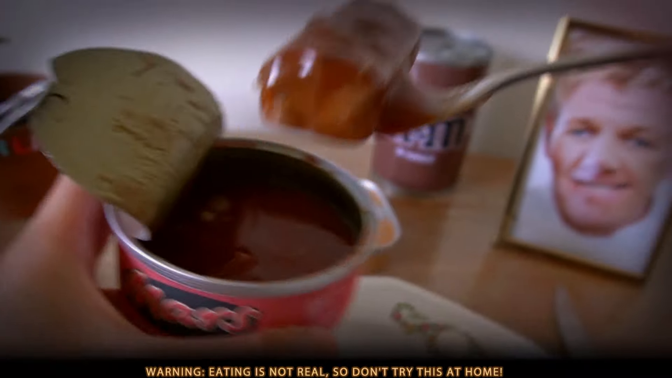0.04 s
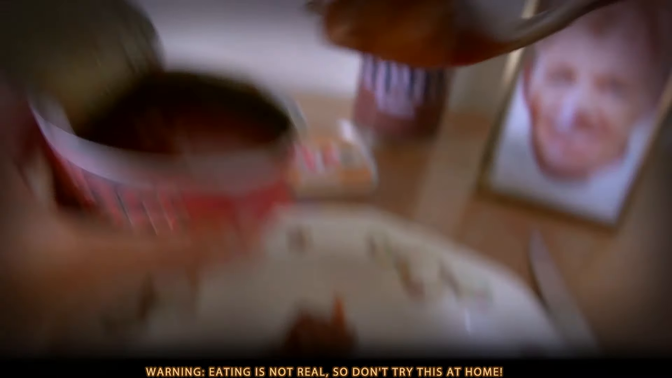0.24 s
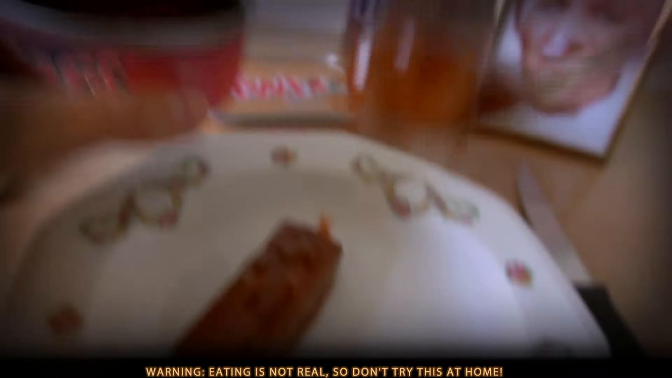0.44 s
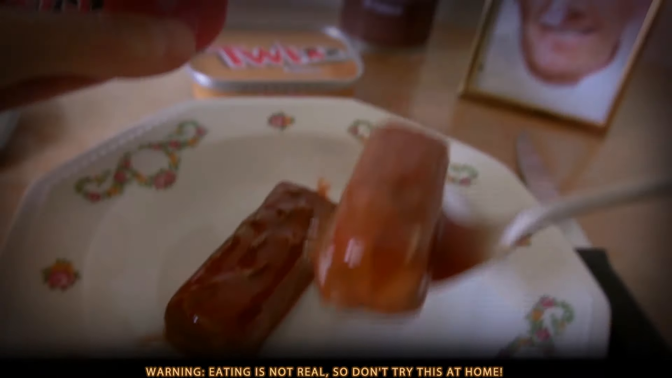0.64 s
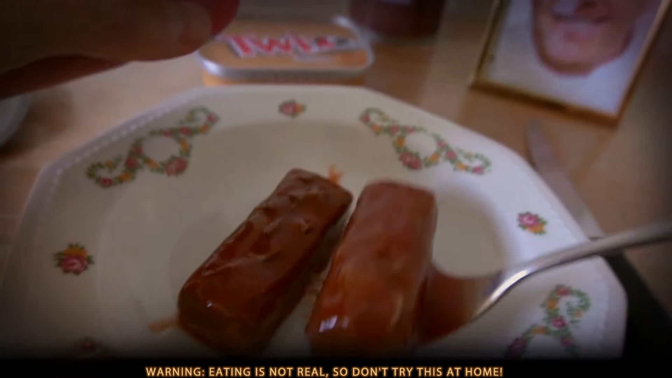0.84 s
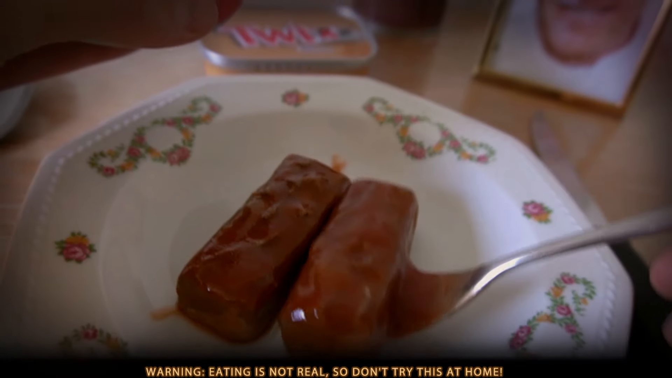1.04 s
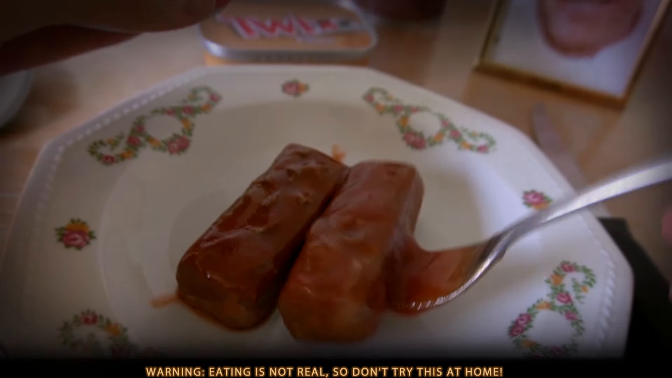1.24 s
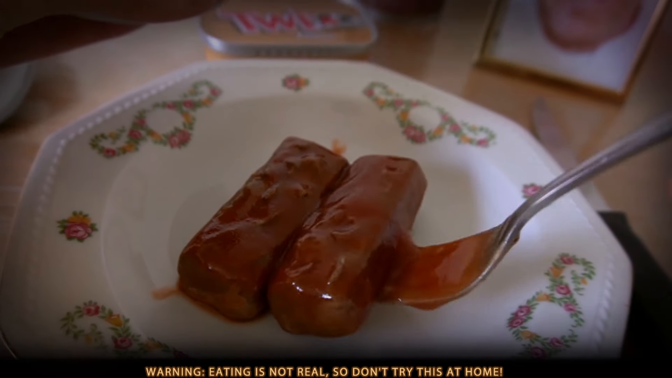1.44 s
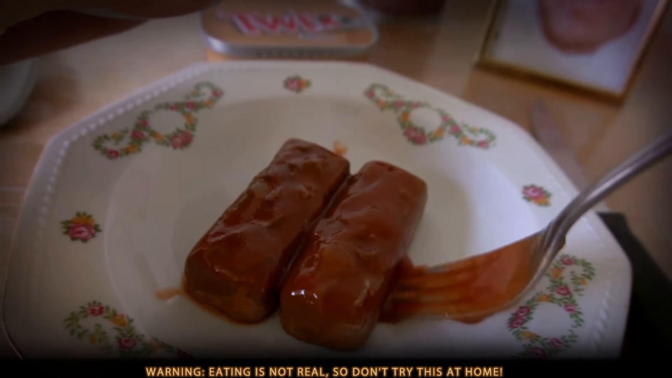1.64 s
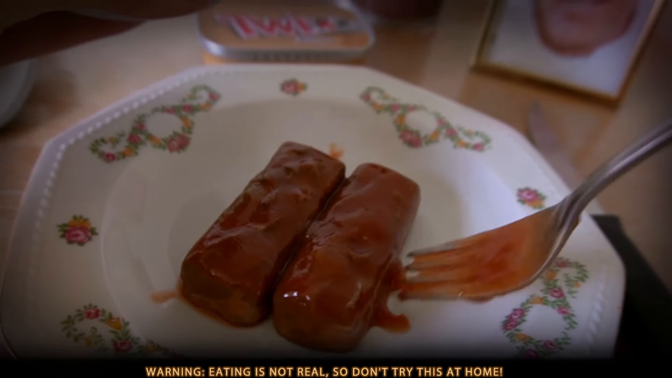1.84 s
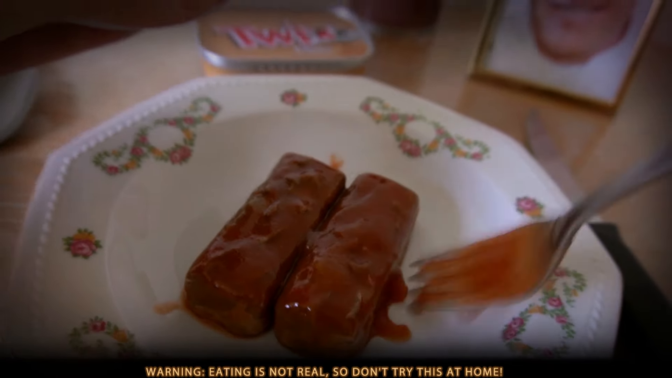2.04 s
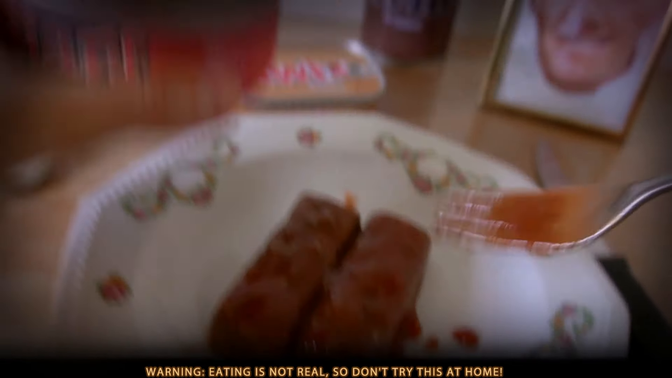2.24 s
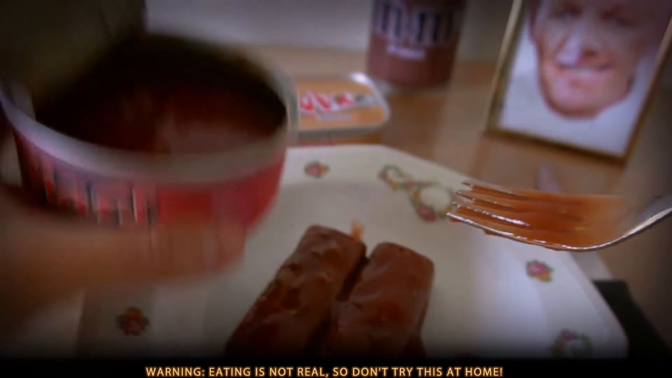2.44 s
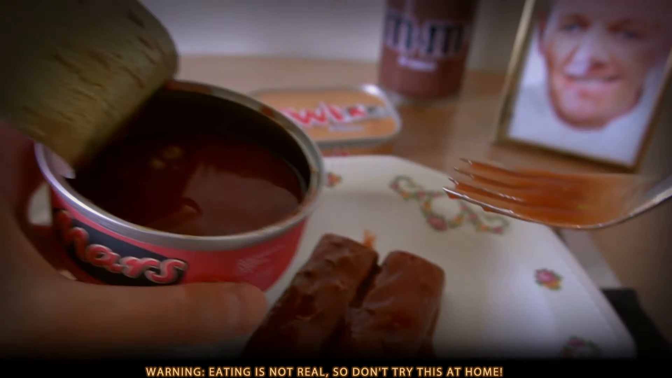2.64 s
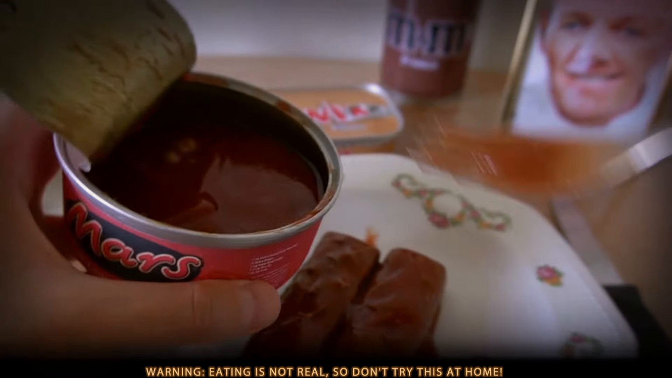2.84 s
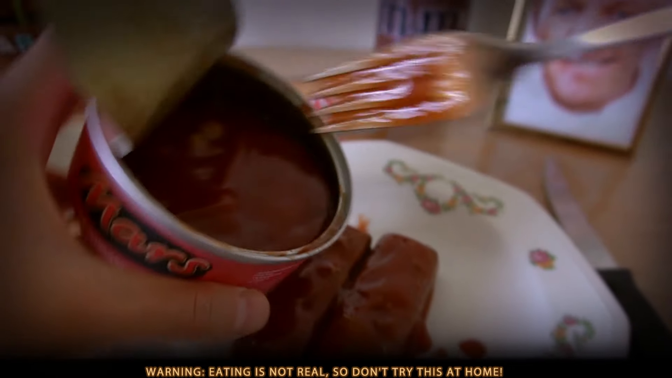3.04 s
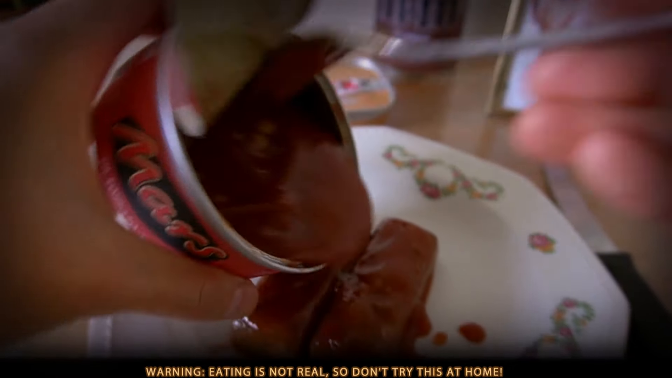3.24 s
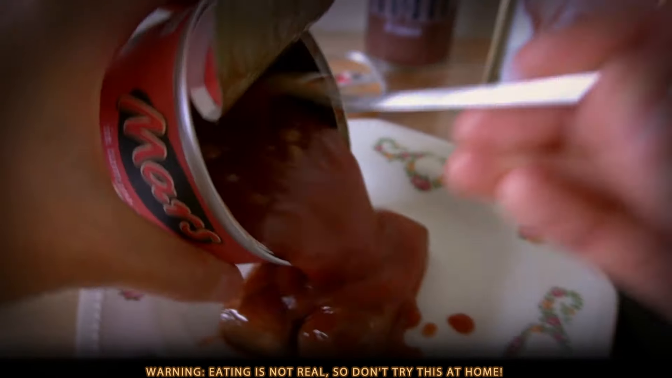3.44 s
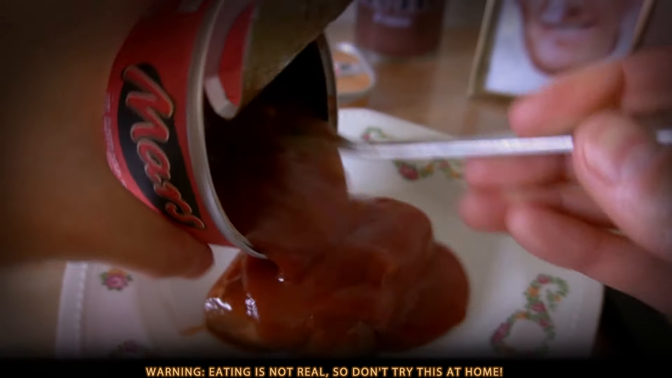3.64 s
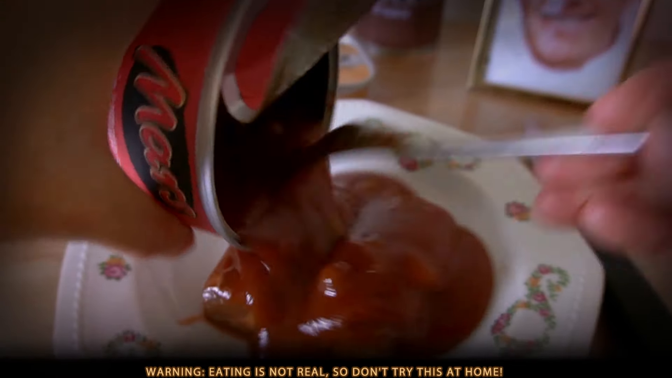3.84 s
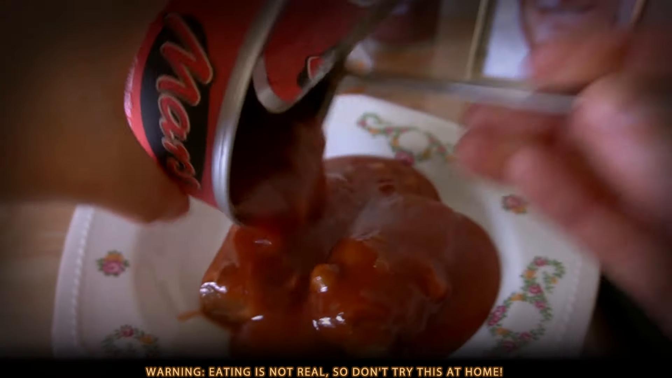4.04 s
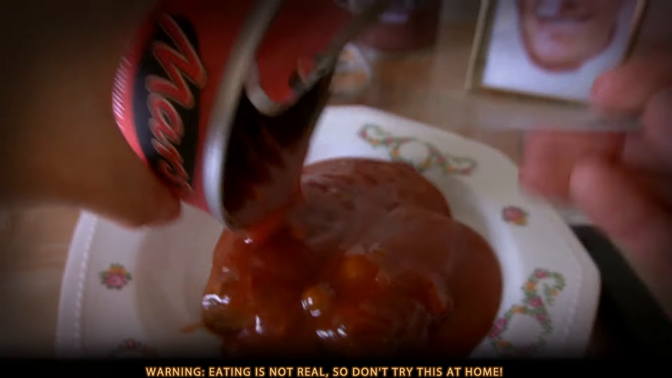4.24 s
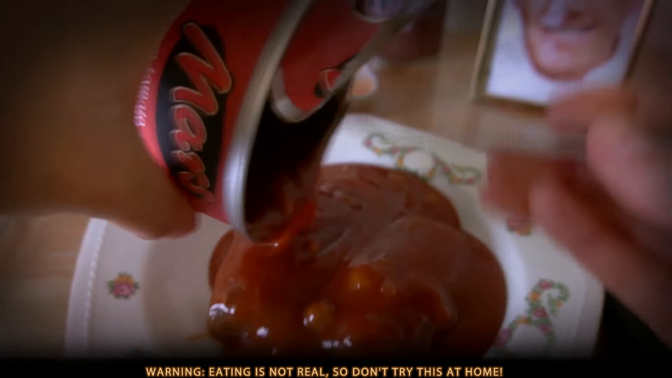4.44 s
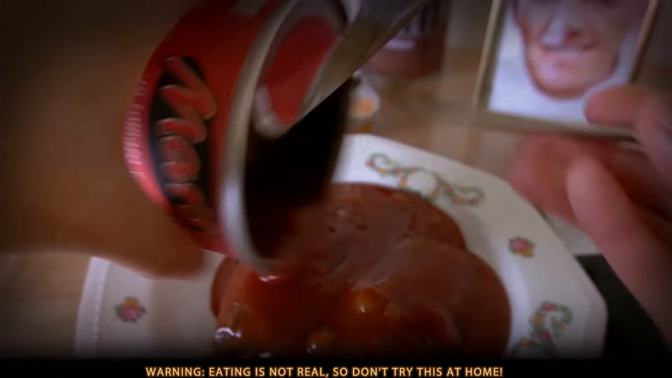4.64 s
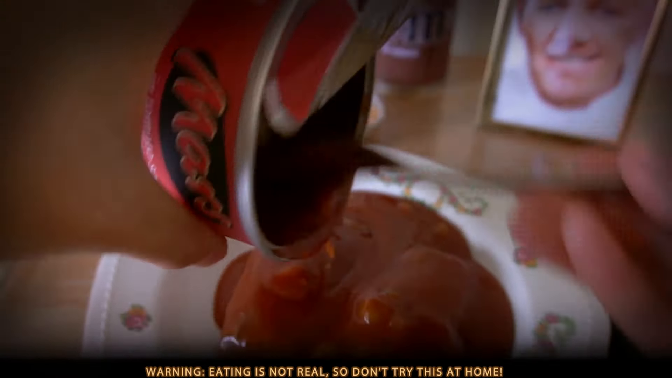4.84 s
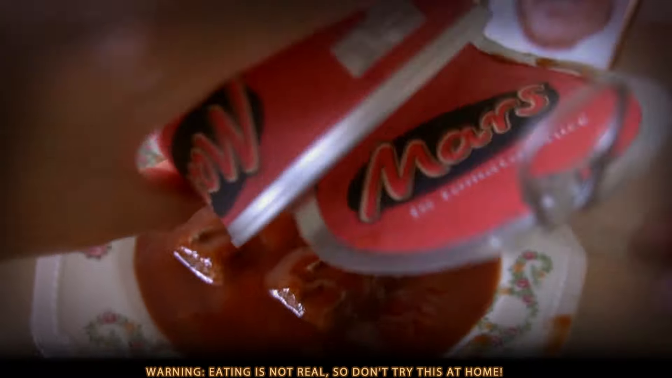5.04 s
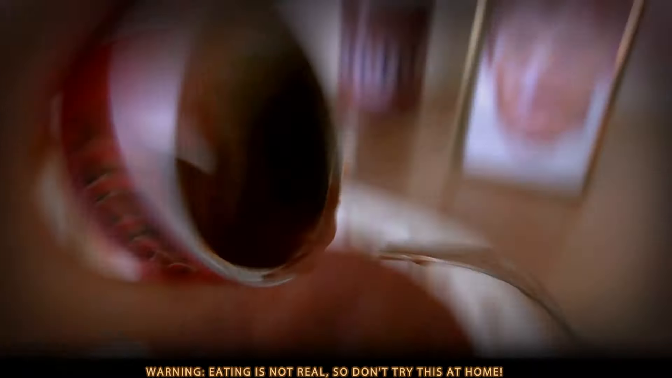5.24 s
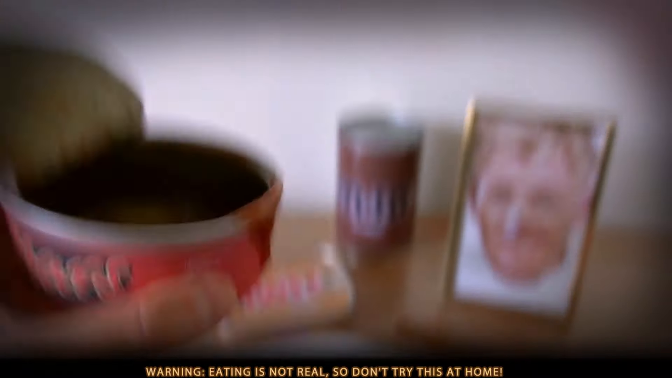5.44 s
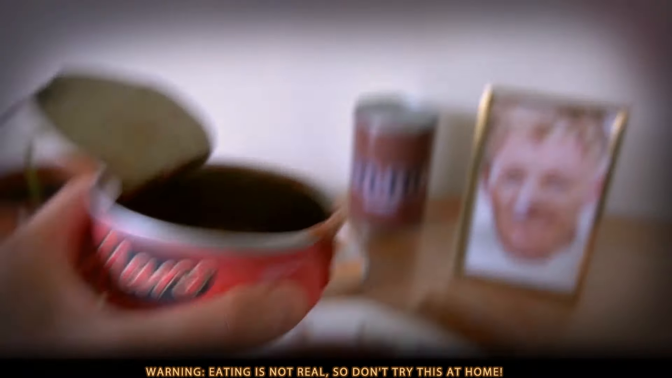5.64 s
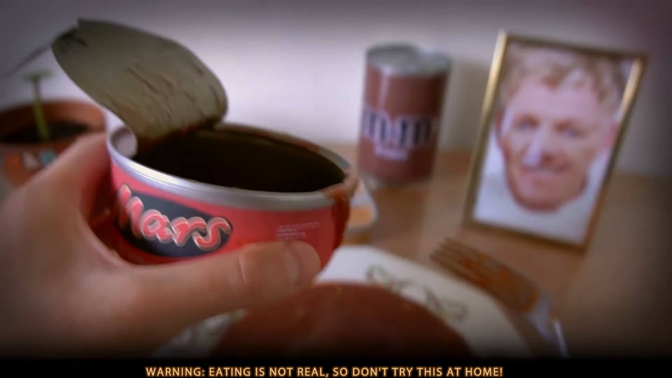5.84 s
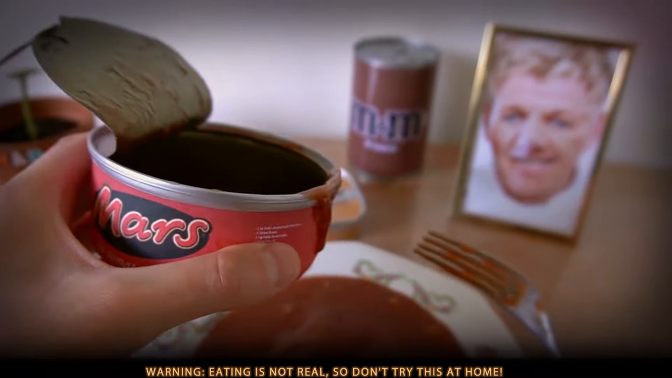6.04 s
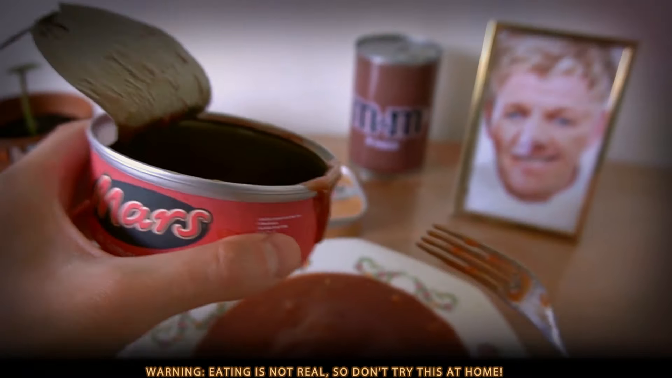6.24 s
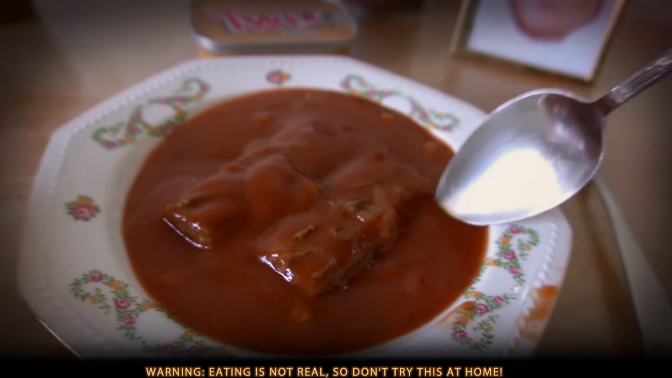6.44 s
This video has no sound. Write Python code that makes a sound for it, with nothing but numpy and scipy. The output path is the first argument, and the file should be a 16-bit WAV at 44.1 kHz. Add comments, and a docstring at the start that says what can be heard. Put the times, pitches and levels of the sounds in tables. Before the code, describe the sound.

Soft, low-weighted room tone runs throughout, wide in stereo. At about 1.0 s a loaded fork touches a china plate: a deep, round thump that throbs slowly in the table, with a tiny muted ping. From 1.3 to 1.8 s the tines slide out in four faint, bright pulls, with a wooden knock near 1.44 s. A soft touch and small china ping come at 2.13 s, then quiet. At 3.27 s the fork enters an open tin with a knock and a squeaky scrape, followed by single knocks near 3.5 and 3.76 s and short scrapes around 3.85 s. From 4.0 to 4.9 s hollow knocks, ringing metal, gritty judders and low tin thuds crowd in clusters, strongest near 4.75 s. A final knock and scrape at 5.15 s are cut dead with their echo at 5.3 s. Room tone remains, with a faint rub from 6.35 s until the end at about 6.5 s.

```python
"""A fork sets a sauce-coated bar on a china plate, which thumps on the table, then slides out from under it.
Next it knocks, scrapes and squeaks inside an open tin that thuds on the plate, in a small live room.
Noise bursts strike the resonances of table, china and tin; stick-slip noise drives the slides and scrapes.
At 5.323 s action and echo are cut off; room tone goes on alone, joined late by a faint rub of coloured noise."""
import sys
import numpy as np
from scipy import signal
from scipy.fft import rfft, irfft, next_fast_len
from scipy.io import wavfile
from scipy.ndimage import map_coordinates

SR = 44100
rng = np.random.default_rng(int(sys.argv[2]) if len(sys.argv) > 2 else 0)


def transcribe(u):
    """Save the signal u as a 16-bit wav file named by the first command-line argument.

    u: samples, shape (n,) or (channels, n), limited to [-1, 1]; the rate is SR.
    q: integer samples, one column per channel.
    """
    v = np.clip(np.atleast_2d(u).T, -1, 1)
    q = np.round(v * 32767).astype(np.int16)
    wavfile.write(sys.argv[1], SR, q)


N = 287091

# room tone colour: (frequency [Hz], relative density [dB per Hz])
AIR_COLOUR = [(12, -45.5), (20, -17), (59, -4.5), (122, -1), (157, -9), (219, -7), (245, -10.5), (372, -14),
              (614, -17.5), (667, -18), (1340, -21), (1870, -20.5), (2760, -25), (13900, -31.5),
              (15500, -52.5)]
# room tone stereo width: (frequency [Hz], side over mid [dB])
AIR_WIDTH = [(60, -19.5), (110, -12.5), (200, -6.5), (380, 1.5), (700, 2.5), (1290, 2), (2380, 0),
             (4400, -1), (8120, -2), (15000, -2.5)]
# stereo width of all other noise: (frequency [Hz], side over mid [dB])
SOURCE_WIDTH = [(120, -35.5), (300, -24.5), (700, -12), (1400, -12), (2400, -8.5), (4000, -3), (8000, -3),
                (13000, -5)]
# fork on the plate: (time [s], thump [dB], table knock [dB], china ping [dB], tick [dB])
PLATE_TOUCHES = [(0.9896, -16, -36.5, -49.5, -47), (1.0151, -70, -40, -59, -60),
                 (1.377, -36, -48.5, -83, -82), (1.436, -30, -30, -65, -65),
                 (1.797, -85, -61.5, -58, -54.5), (2.1297, -28, -47, -38.5, -46)]
# table top under the plate: (resonance [Hz], width [Hz], level [dB])
TABLE_MODES = [(218, 27.5, 5), (305, 35, 5.5), (424, 98, -6.5), (590, 73, -8), (814, 220, -13),
               (1370, 1600, -23), (3540, 440, -22.5)]
# china: (resonance [Hz], width before damping [Hz], level [dB])
CHINA_MODES = [(2404, 56, 1), (3390, 57, -3), (4290, 47, -9), (6130, 85, -6), (6600, 94, -7.5),
               (7120, 98, -2.5), (7930, 77, -11), (8200, 76, -1), (10180, 47, -3.5), (10850, 61, -10),
               (11500, 77, -10), (12670, 97, -1)]
# plate rocking on the table, close modes that beat: (frequency [Hz], level [dB], t60 [s], polarity [sign])
ROCKING_MODES = [(116.3, 0, .43, 1), (121.9, -6, .95, -1), (130.1, -8.5, 1.15, -1)]
# room decay: (frequency [Hz], t60 [s])
ROOM_DECAY = [(150, 0.46), (500, 0.48), (1200, 0.44), (3000, 0.49), (7000, 0.41), (14000, 0.54)]
# room colour: (frequency [Hz], level [dB])
ROOM_COLOUR = [(120, 0), (300, 0), (1200, -1), (3500, -1.5), (8000, -4), (14000, -11.5)]
# tines sliding on china: (start [s], hardest push [s], end [s], level [dB])
SLIDE_PULLS = [(1.281, 1.33, 1.36, -55.5), (1.393, 1.45, 1.52, -51), (1.551, 1.624, 1.70, -48.5),
               (1.719, 1.777, 1.815, -52.5)]
# light touches of the tines: (time [s], level [dB])
TINE_TICKS = [(3.11, -66), (4.08, -37), (4.128, -48), (4.136, -51), (4.21, -43.5), (5.036, -53.5),
              (5.193, -57), (6.365, -72)]
# fork against the tin: (time [s], relative strength [dB], hardness [dB per octave],
# three resonances under the fork [Hz, Hz, Hz])
TIN_KNOCKS = [(3.2668, -33, -1.3, 1260, 1440, 3800), (3.5195, -29.5, -0.16, 654, 1223, 2270),
              (3.7648, -36.5, 3, 900, 1410, 2960), (4.005, -27.5, -2, 870, 1275, 3720),
              (4.0697, -30.5, 2, 574, 1150, 2620), (4.1758, -29.5, 2, 845, 2510, 3144),
              (4.359, -26, .6, 800, 1046, 3700), (4.4312, -31.5, 2.5, 636, 1130, 2370),
              (4.4853, -30, 1, 820, 400, 4270), (4.6775, -28.5, 2.5, 810, 1190, 1600),
              (4.7403, -27, 0.5, 481, 2350, 3600), (5.1519, -27, -1.8, 1228, 1900, 3160)]
# tin: (resonance before detuning [Hz], width [Hz], level [dB])
TIN_MODES = [(262, 60, -11), (448, 78, -11), (629, 128, -3), (884.4, 102, 2.5), (1094, 64, 1),
             (1222.4, 62, 5), (1532, 155, -1), (1986, 273, -3.5), (2328, 141, -2.5), (3110, 85, -8),
             (3605, 76, -12), (4300, 60, -16), (5000, 93, -28)]
# registers of the tin, hollow, lid, wall, rim, crack: (low [Hz], high [Hz], t60 of the contact's buzz [s])
TIN_REGISTERS = [(170, 900, .04), (900, 1800, .028), (1800, 2900, .024), (2900, 5000, .018),
                 (5000, 14800, .013)]
# answer of each register to a plain knock: relative level [dB]
REGISTER_ANSWERS_DB = [-2, -0.25, 0.75, -1.3, 1]
# the fork's own ring: (frequency [Hz], level [dB], t60 [s])
FORK_MODES = [(1195, 0.5, .45), (1249, 2, 1.33), (2380, -7, .42), (3464, -16, .3)]
# fork strokes in the tin: (start [s], hardest push [s], end [s], strength [dB],
# hollow boom over strength [dB], bite over strength [dB])
TIN_STROKES = [(3.285, 3.34, 3.42, -29.5, -9.5, -17), (3.444, 3.463, 3.505, -38.5, -15, -18),
               (3.819, 3.848, 3.868, -38, -9, -17.5), (3.871, 3.883, 3.903, -34, -14, -16),
               (4.018, 4.024, 4.062, -20.5, -5.5, -25.5), (4.088, 4.084, 4.118, -23.5, -3, -17.5),
               (4.125, 4.138, 4.146, -24.5, -15.5, -19), (4.207, 4.23, 4.275, -30, -5, -10),
               (4.376, 4.409, 4.419, -23.5, -5.5, -22), (4.446, 4.446, 4.478, -24.5, -5, -14.5),
               (4.495, 4.497, 4.53, -37, 13, 4), (4.697, 4.732, 4.735, -22, -2.5, -15),
               (4.754, 4.745, 4.785, -16.5, -10, -14.5), (4.796, 4.823, 4.84, -24.5, -7, -3),
               (4.845, 4.847, 4.875, -20, -10.5, -14.5), (4.979, 4.99, 5.012, -46.5, -7.5, 5),
               (5.173, 5.195, 5.26, -30.5, 0, -11)]
# creaks of the bending lid and squeaks of the tines, gliding:
# (start [s], loudest [s], end [s], start pitch [Hz], end pitch [Hz], level [dB])
CREAK_GLIDES = [(3.29, 3.421, 3.46, 424, 705, -41.5), (3.29, 3.353, 3.42, 1220, 910, -34.5),
                (3.285, 3.34, 3.39, 1587, 1495, -28.5), (3.29, 3.347, 3.44, 1304, 1373, -30),
                (3.455, 3.473, 3.512, 1474, 1666, -38), (4.489, 4.502, 4.515, 4280, 4224, -36.5),
                (4.49, 4.505, 4.525, 3140, 2703, -38)]
# low thuds of the tin touching the plate: (time [s], level [dB])
TIN_THUDS = [(3.518, -48.5), (3.764, -46), (4.071, -42.5), (4.175, -36.5), (4.432, -45), (4.487, -43),
             (4.741, -50)]
# faint rub: (time [s], level [dB])
RUB_LEVEL = [(6.3, -76.5), (6.37, -56), (6.44, -54.5), (6.51, -50.5)]
# rub colour: (frequency [Hz], relative density [dB per Hz])
RUB_COLOUR = [(200, -7.5), (400, -8.5), (900, -13), (2200, -7), (5000, -2.5), (11000, -6.5), (15000, -11)]

AIR_DB = -58.5
CUT_S = 5.323
TOP_HZ = 14650
KNOCK_DB, FORK_DB = -7, -10.5  # added to the strength of each knock
SPOT_DB = 8  # register lift per resonance under the fork
PIVOT_HZ = 1526  # hardness tilts the registers about this
WALL_DB, WALL_BITE = 3.5, 0.59  # wall level over strength; share of the bite added to it
# growth before and decay after the hardest push
SLIDE_RISE_DB_PER_S, SLIDE_FALL_DB_PER_S = 220, 280
STROKE_RISE_DB_PER_S, STROKE_FALL_DB_PER_S = 109.5, 203
CREAK_RISE_DB_PER_S, CREAK_FALL_DB_PER_S = 132, 240


def amp(db):
    """Decibels to gain."""
    return 10 ** (np.asarray(db) / 20)


def unit(x):
    """Scale to rms 1."""
    return x / np.sqrt(np.mean(x ** 2) + 1e-20)


def blow(x):
    """Scale to the energy of 30 ms at rms 1."""
    energy = np.sum(np.mean(np.atleast_2d(x) ** 2, axis=0))
    return x / np.sqrt(energy / (.03 * SR) + 1e-20)


def along(points, hz):
    """Interpolate (Hz, value) points on a log axis."""
    f, v = np.transpose(points)
    return np.interp(np.log(hz + 1), np.log(f + 1), v)


def level(rows):
    """Gain per sample from (s, dB) rows, -120 dB before them."""
    return amp(np.interp(np.arange(N) / SR, *np.transpose(rows), left=-120))


def add(track, time_s, x):
    """Mix x into the track at a time."""
    slot = track[..., round(time_s * SR):][..., :x.shape[-1]]
    slot += x[..., :slot.shape[-1]]


def filtered(x, response):
    """Apply a complex response of frequency."""
    m = next_fast_len(x.shape[-1] + SR // 4)
    return irfft(rfft(x, m) * response(np.fft.rfftfreq(m, 1 / SR)), m)[..., :x.shape[-1]]


def body(x, modes):
    """Parallel resonances of alternating polarity."""
    def response(f):
        total = 0
        for k, (hz, width_hz, db) in enumerate(modes):
            damping = 1j * f * width_hz
            total = total + (-1) ** k * amp(db) * damping / (hz * hz - f * f + damping)
        return total
    return filtered(x, response)


def band(x, low_hz, high_hz):
    """Causal band-pass."""
    return signal.sosfilt(signal.butter(2, [low_hz, high_hz], "band", fs=SR, output="sos"), x)


def stereo(size, width):
    """White mid noise, with side noise set per frequency by the width table."""
    mid, side = rng.standard_normal((2, size))
    side = filtered(side, lambda hz: amp(along(width, hz)))
    return unit(np.array([mid + side, mid - side]))


def hiss(colour, width):
    """Stereo noise of rms 1 with the given colour."""
    return unit(filtered(stereo(N, width), lambda hz: amp(along(colour, hz))))


def contact(t60_s, size=SR // 3):
    """Brief buzz of two hard things meeting: decaying noise."""
    return stereo(size, SOURCE_WIDTH) * amp(-60 * np.arange(size) / SR / t60_s)


def slips(size, rate_hz, scatter_db, t60_s, drag):
    """Stick and slip: bursts of uneven size at an uneven rate, over a steady drag."""
    chance = rng.standard_normal((size // 40, 2))
    at = np.cumsum(np.exp(.5 * chance[:, 0]) * SR / rate_hz).astype(int)
    kicks = np.bincount(at, amp(scatter_db * chance[:, 1]), size)[:size]
    grip = signal.lfilter([1], [1, -amp(-60 / SR / t60_s)], kicks)
    return stereo(size, SOURCE_WIDTH) * (unit(grip) + drag)


def stroke_time(start_s, end_s):
    """Time axis [s] of a stroke, with 10 ms to spare at each end."""
    return np.arange(start_s - .01, end_s + .01, 1 / SR)


def swell(t, start_s, peak_s, end_s, rise_db_per_s, fall_db_per_s, fade_s=.006):
    """Gain of one push: grows until the peak, eases off, stops as the contact lifts."""
    touch = np.clip(np.minimum(t - start_s, end_s - t) / fade_s + 1, 0, 1)
    return touch * amp(-np.maximum(rise_db_per_s * (peak_s - t), fall_db_per_s * (t - peak_s)))


def wobble(size, rate_hz):
    """Smooth random curve, rate_hz knots a second."""
    knots = rng.standard_normal(int(size * rate_hz / SR) + 4)
    return map_coordinates(knots, [np.arange(size) * rate_hz / SR])


def travelling(force, modes, swing_db, rate_hz):
    """A moving contact crosses nodes and bellies, so each resonance swells and fades on its own."""
    out = 0
    for k, mode in enumerate(modes):
        gain = amp(swing_db * wobble(force.shape[-1], rate_hz))
        out = out + (-1) ** k * body(force, [mode]) * gain
    return out


def room_tone():
    """Steady coloured stereo noise."""
    return amp(AIR_DB) * hiss(AIR_COLOUR, AIR_WIDTH)


def china(damping):
    """China resonances broadened by damping."""
    return [(hz, width_hz * damping, db) for hz, width_hz, db in CHINA_MODES]


def plate():
    """Each touch knocks the table, pings the laden china and ticks."""
    out = np.zeros((2, N))
    for s, _, knock_db, china_db, tick_db in PLATE_TOUCHES:
        add(out, s, amp(knock_db) * blow(body(contact(0.021), TABLE_MODES)))
        add(out, s, amp(china_db) * blow(body(contact(0.018), china(damping=1.7))))
        add(out, s, amp(tick_db) * blow(band(contact(0.004), 670, 18000)))
    return out


def rocking(rise_s=.006):
    """Each touch rocks the plate; close modes beat in a slow throb through the table, not the room."""
    out, t = np.zeros(N), np.arange(SR) / SR
    rock = np.zeros(SR)
    for hz, db, t60_s, polarity in ROCKING_MODES:
        rock += np.sign(polarity) * amp(db - 60 * t / t60_s) * np.sin(2 * np.pi * hz * t)
    thump = blow(rock * (1 - np.exp(-t / rise_s)))
    for s, thump_db, *_ in PLATE_TOUCHES:
        add(out, s, amp(thump_db) * thump)
    return out


def room(x, build_s=0.0004):
    """Fast-building noise echo, t60 by frequency, with a fresh random tail for each stretch between touches."""
    out, source = np.zeros((2, N)), x.mean(axis=0)
    edges_s = [row[0] - .006 for row in list(PLATE_TOUCHES) + list(TIN_KNOCKS)] + [CUT_S]
    for start_s, end_s in zip(edges_s, edges_s[1:]):
        hz, t, z = signal.stft(stereo(SR // 2, SOURCE_WIDTH), SR, nperseg=256)
        t60_s = along(ROOM_DECAY, hz)[:, None]
        decay = amp(along(ROOM_COLOUR, hz)[:, None] - 60 * t / t60_s)
        decay = decay * np.sqrt(2 * np.log(1000) / t60_s / SR)  # equal energy for any t60
        tail = signal.istft(z * decay * (1 - np.exp(-t / build_s)), SR, nperseg=256)[1]
        part = source[None, round(start_s * SR):round(end_s * SR)]
        add(out, start_s, signal.fftconvolve(part, tail, axes=1))
    return out


def slide():
    """Pressed tines damp the china, broadening its resonances, and slide in a few short pulls."""
    out = np.zeros((2, N))
    for start_s, peak_s, end_s, db in SLIDE_PULLS:
        t = stroke_time(start_s, end_s)
        force = slips(len(t), rate_hz=300, scatter_db=1.5, t60_s=.005, drag=.6)
        ring = travelling(force, china(damping=1.9), swing_db=4, rate_hz=15)
        push = swell(t, start_s, peak_s, end_s, SLIDE_RISE_DB_PER_S, SLIDE_FALL_DB_PER_S)
        add(out, t[0], amp(db) * push * unit(ring))
    return out


def ticks():
    """Light touches of the tines: bright noise bursts."""
    out = np.zeros((2, N))
    for s, db in TINE_TICKS:
        add(out, s, amp(db) * blow(band(contact(0.021, size=SR // 8), 3200, 16000)))
    return out


def detuned_tin(detune):
    """Tin resonances, each detuned at random on every call."""
    return [(hz * np.exp(detune * rng.standard_normal()), width_hz, db) for hz, width_hz, db in TIN_MODES]


def tin(force, spots_hz):
    """The tin rings most at the resonances under the fork; many weak modes pass the force almost flat."""
    ring = body(force, detuned_tin(detune=0.0047)) + amp(-12) * band(force, 800, 14980)
    return ring + amp(7) * sum(body(ring, [(hz, 0.074 * hz, 0)]) for hz in spots_hz)


def fork_ring():
    """The fork's decaying sines."""
    t = np.arange(SR) / SR
    return blow(sum(amp(db - 60 * t / t60_s) * np.sin(2 * np.pi * hz * t) for hz, db, t60_s in FORK_MODES))


def knocks():
    """Hardness and where the fork lands decide how each register of the tin answers; the fork rings on."""
    out, fork = np.zeros((2, N)), fork_ring()
    for s, strength_db, hardness_db_per_octave, *spots_hz in TIN_KNOCKS:
        for answer_db, (low_hz, high_hz, t60_s) in zip(REGISTER_ANSWERS_DB, TIN_REGISTERS):
            under_hz = [hz for hz in spots_hz if low_hz < hz < high_hz]
            octaves = np.log2(np.sqrt(low_hz * high_hz) / PIVOT_HZ)
            db = strength_db + KNOCK_DB + answer_db
            db += hardness_db_per_octave * octaves + SPOT_DB * len(under_hz)
            ring = tin(contact(t60_s, size=SR // 8), under_hz)
            add(out, s, amp(db) * blow(band(ring, low_hz, high_hz)))
        add(out, s, amp(strength_db + FORK_DB) * fork)
    return out


def scrapes():
    """Tines judder along the tin; more bite makes the wall answer more and adds fine grit."""
    out = np.zeros((2, N))
    for start_s, peak_s, end_s, db, boom_db, bite_db in TIN_STROKES:
        t = stroke_time(start_s, end_s)
        force = slips(len(t), rate_hz=150, scatter_db=-1.5, t60_s=0.0099, drag=0.15)
        judder = travelling(force, detuned_tin(detune=0.026), swing_db=2, rate_hz=59)
        judder = judder + amp(-17) * band(force, 640, 6000)
        high_modes = [(hz * np.exp(.02 * rng.standard_normal()), 450, 0) for hz in np.arange(5000, 15000, 800)]
        fine_force = slips(len(t), rate_hz=700, scatter_db=2, t60_s=.008, drag=1)
        grit = travelling(fine_force, high_modes, swing_db=3, rate_hz=70)
        push = amp(db) * swell(t, start_s, peak_s, end_s, STROKE_RISE_DB_PER_S, STROKE_FALL_DB_PER_S)
        parts = [(judder, 170, 900, boom_db),
                 (judder, 900, 1800, 0),
                 (judder, 1900, 5000, WALL_DB + WALL_BITE * bite_db),
                 (grit, 5000, 14800, bite_db)]
        for x, low_hz, high_hz, part_db in parts:
            add(out, t[0], push * amp(part_db) * unit(band(x, low_hz, high_hz)))
    return out


def creak(width_hz=28):
    """Slips keep narrow, gliding resonances of lid and tines ringing: low-passed noise on a gliding carrier."""
    out = np.zeros(N)
    for start_s, peak_s, end_s, start_hz, end_hz, db in CREAK_GLIDES:
        t = stroke_time(start_s, end_s)
        noise = rng.standard_normal((2, len(t)))
        real, imag = filtered(noise, lambda f: 1 / (1 + 1j * f / width_hz) ** 2)
        phase = 2 * np.pi * np.cumsum(np.interp(t, [start_s, end_s], [start_hz, end_hz])) / SR
        squeak = unit(real * np.cos(phase) + imag * np.sin(phase))
        push = swell(t, start_s, peak_s, end_s, CREAK_RISE_DB_PER_S, CREAK_FALL_DB_PER_S)
        add(out, t[0], amp(db) * push * squeak)
    return out


def thuds():
    """Low thuds of the tin touching the plate: low noise bursts."""
    out = np.zeros((2, N))
    for s, db in TIN_THUDS:
        add(out, s, amp(db) * blow(band(contact(.04), 105, 240)))
    return out


def rub():
    """Faint coloured noise under a slow level curve."""
    return level(RUB_LEVEL) * hiss(RUB_COLOUR, SOURCE_WIDTH)


def scene():
    """Plate and tin in the room until the cut, over room tone and rub."""
    near = plate() + slide() + ticks() + knocks() + scrapes() + creak() + thuds()
    action = (near + room(near) + rocking()) * (np.arange(N) / SR < CUT_S)
    return room_tone() + action + rub()


def record(dry):
    """Steep low-pass at the band limit."""
    return filtered(dry, lambda hz: 1 / np.sqrt(1 + (hz / TOP_HZ) ** 120))


dry = scene()
out = record(dry)
transcribe(out)
```